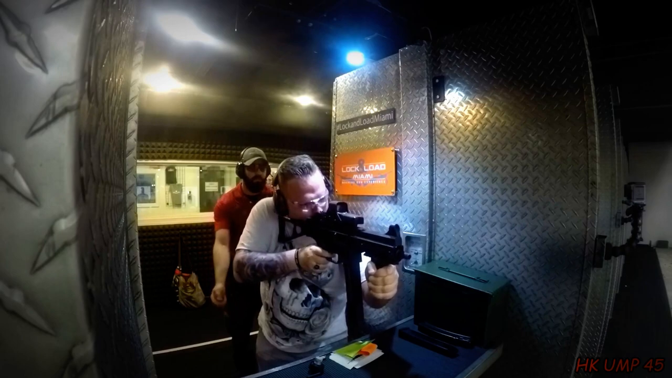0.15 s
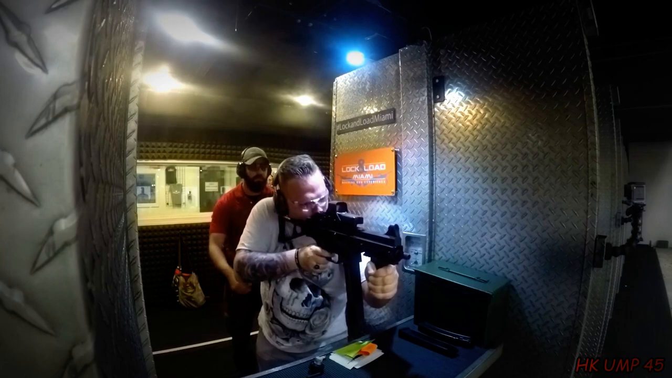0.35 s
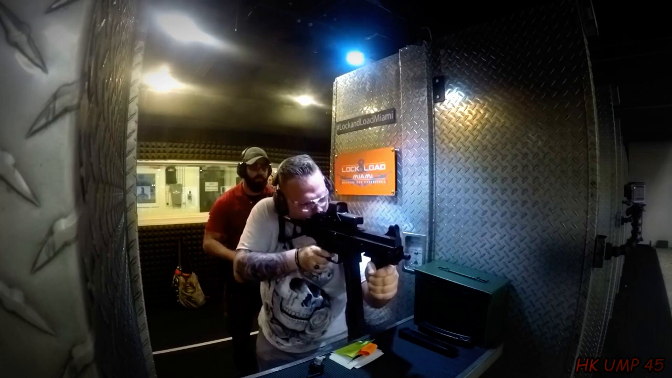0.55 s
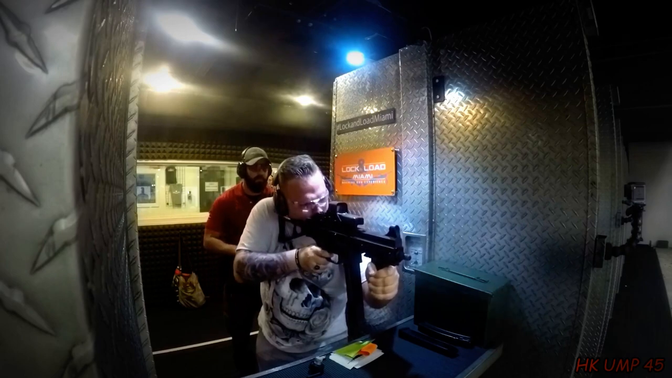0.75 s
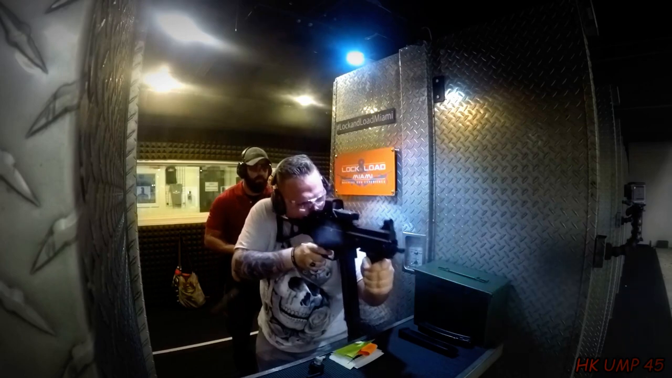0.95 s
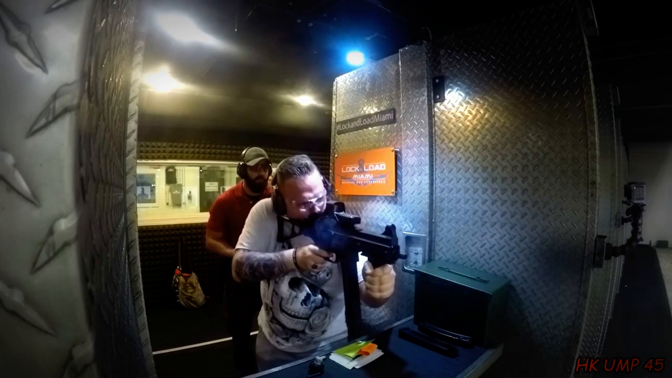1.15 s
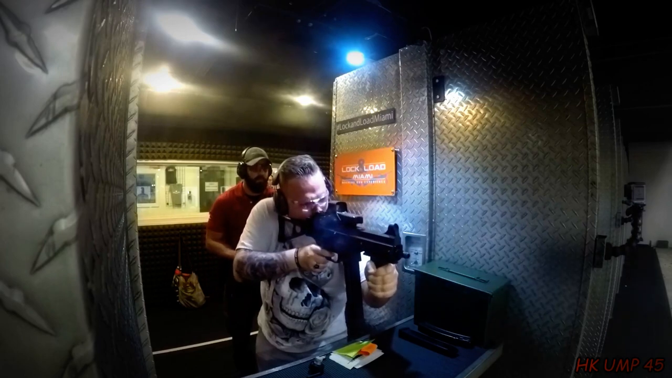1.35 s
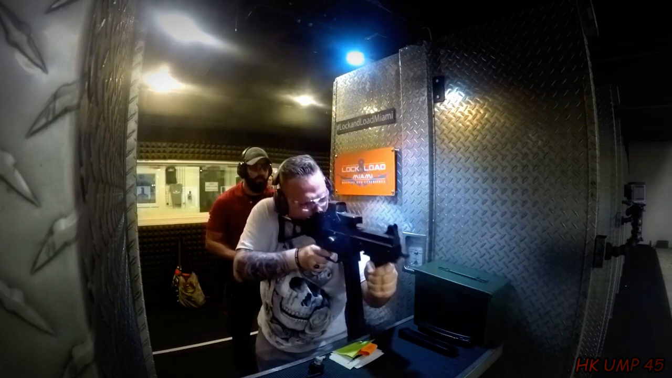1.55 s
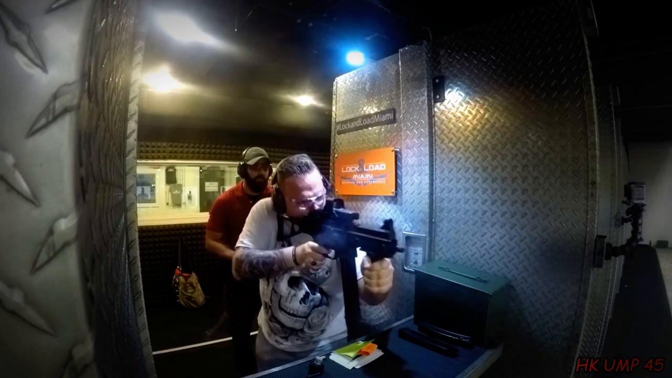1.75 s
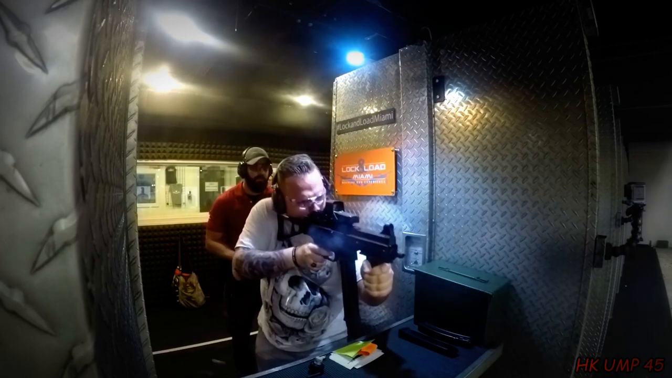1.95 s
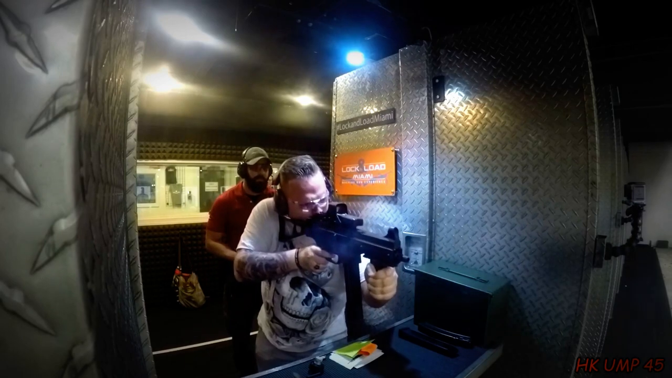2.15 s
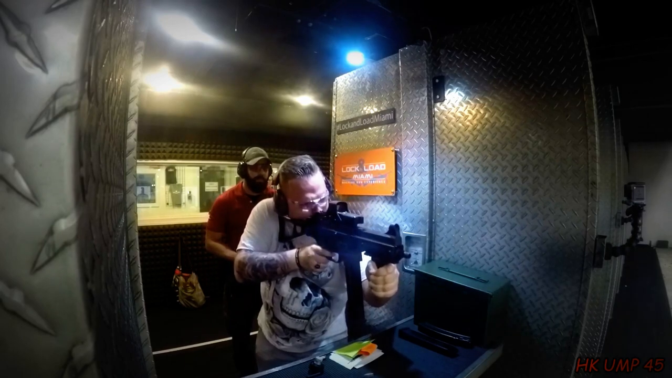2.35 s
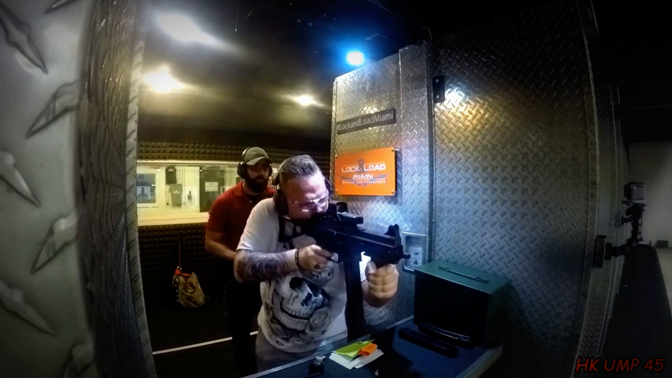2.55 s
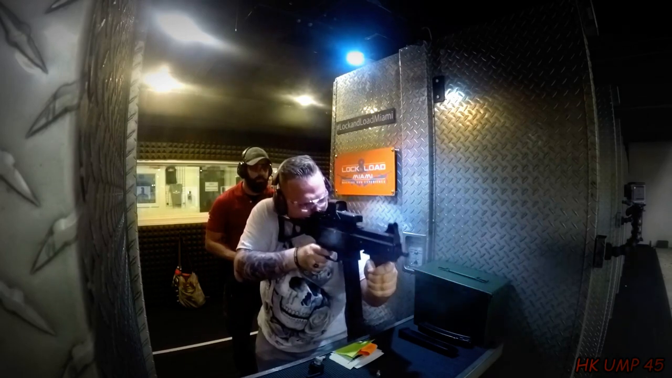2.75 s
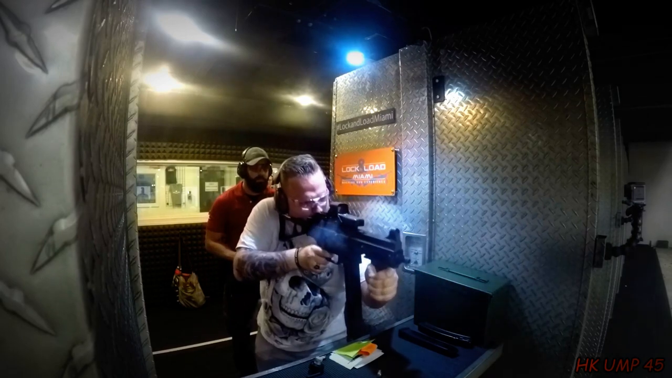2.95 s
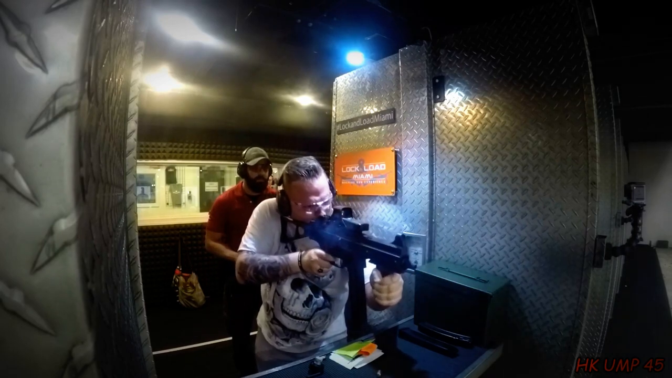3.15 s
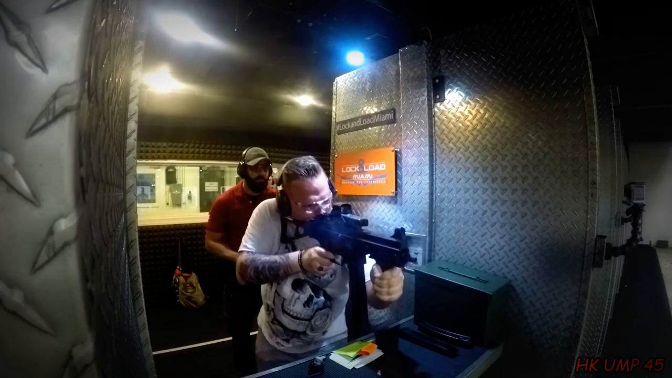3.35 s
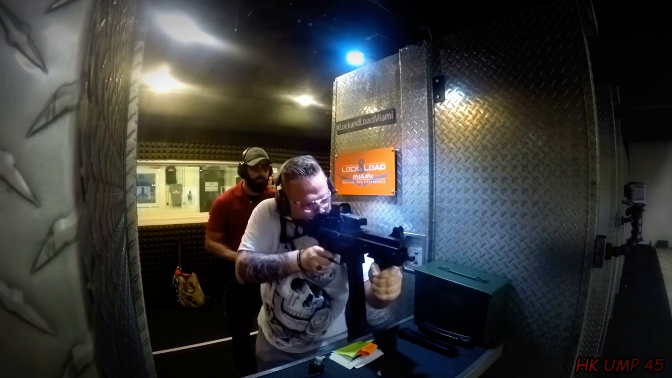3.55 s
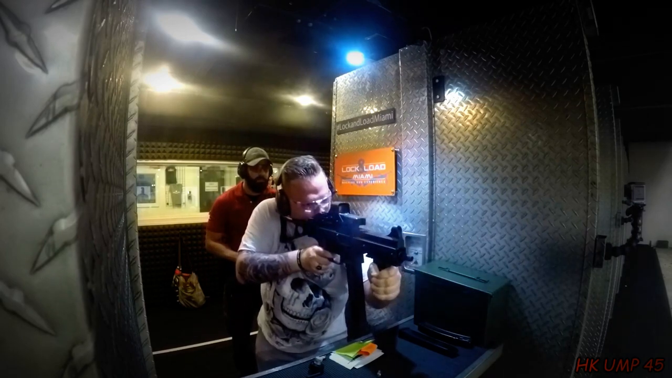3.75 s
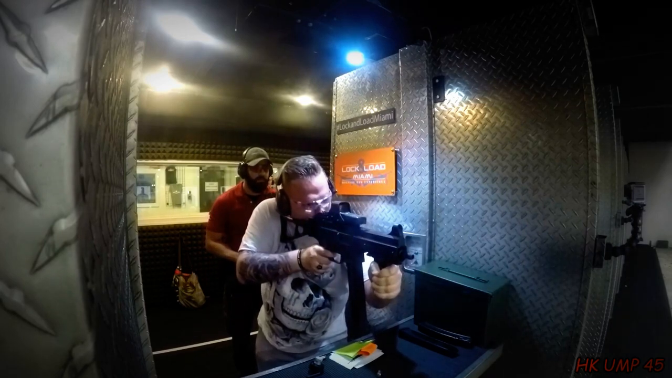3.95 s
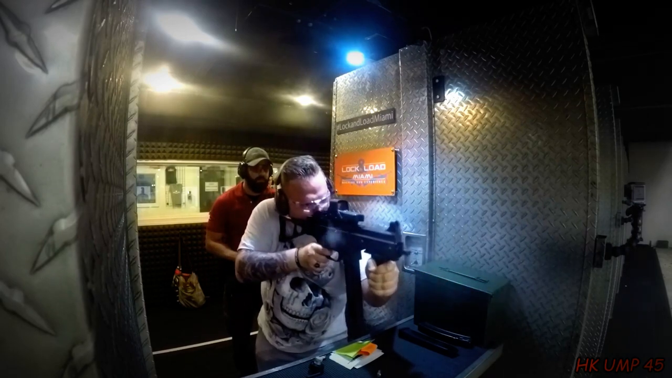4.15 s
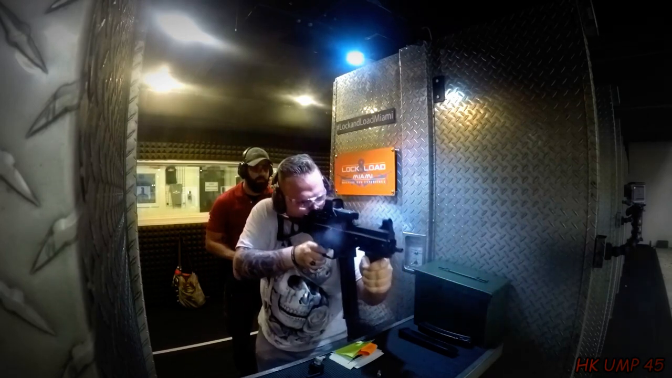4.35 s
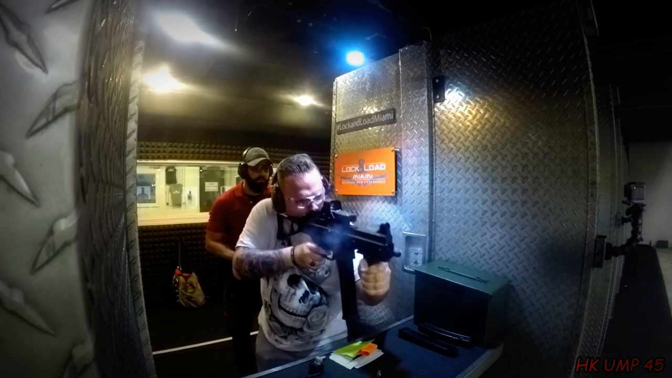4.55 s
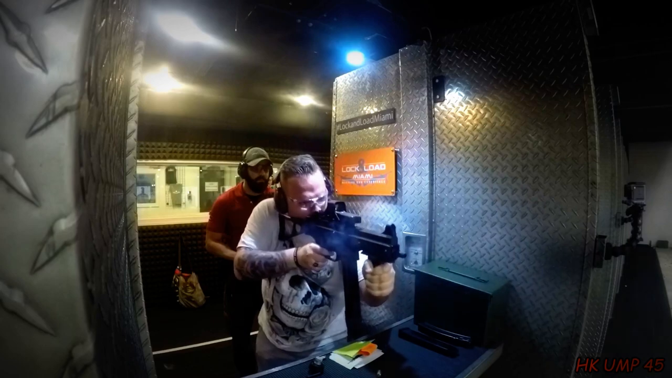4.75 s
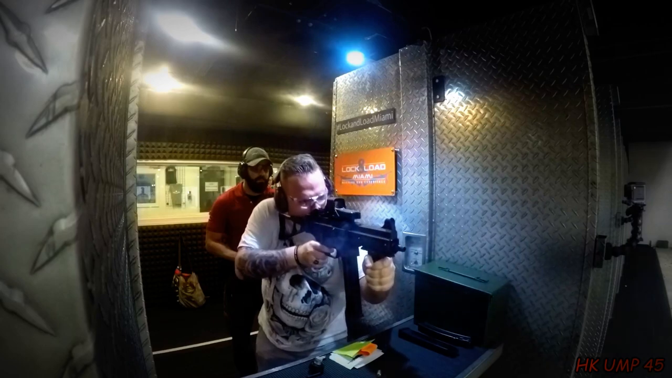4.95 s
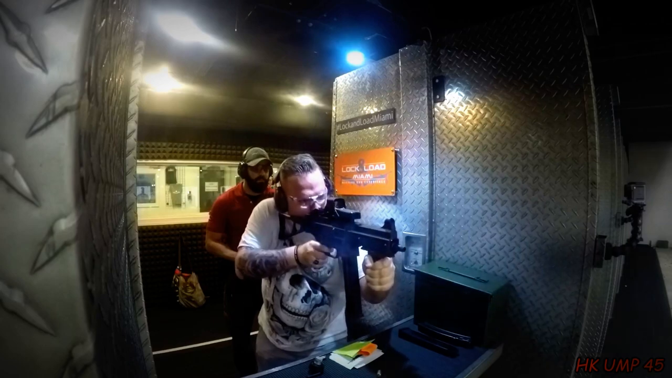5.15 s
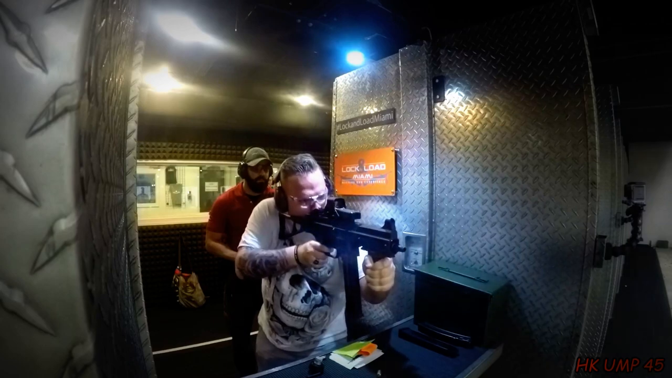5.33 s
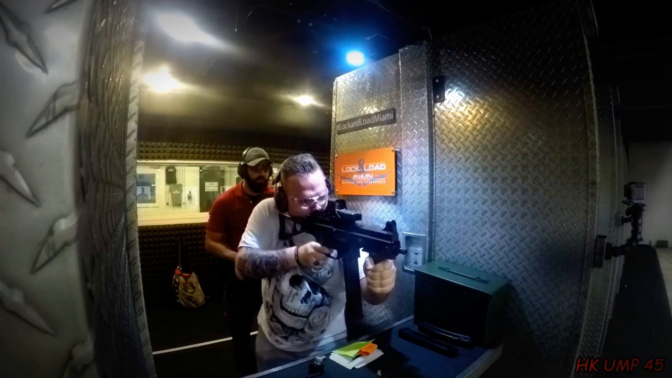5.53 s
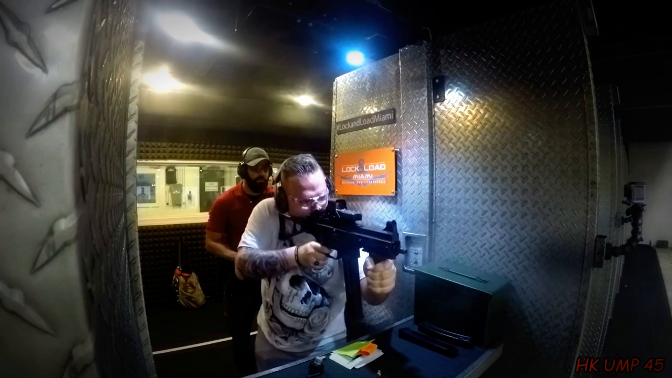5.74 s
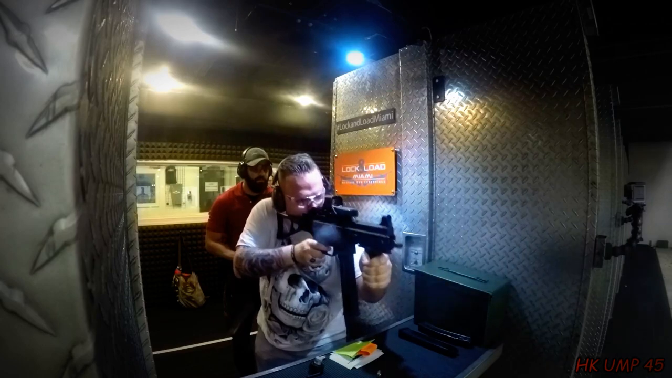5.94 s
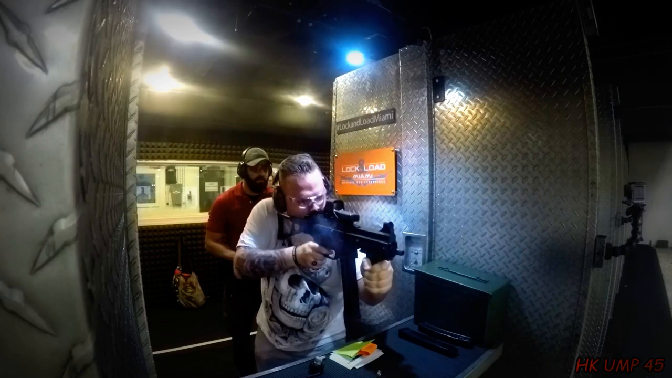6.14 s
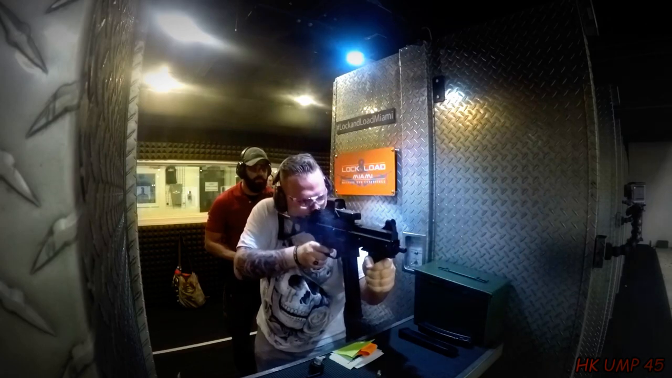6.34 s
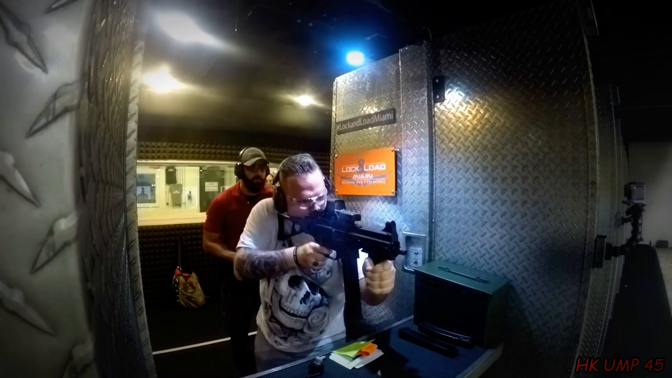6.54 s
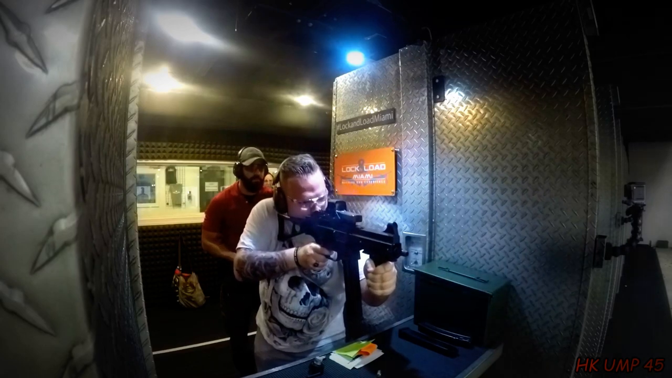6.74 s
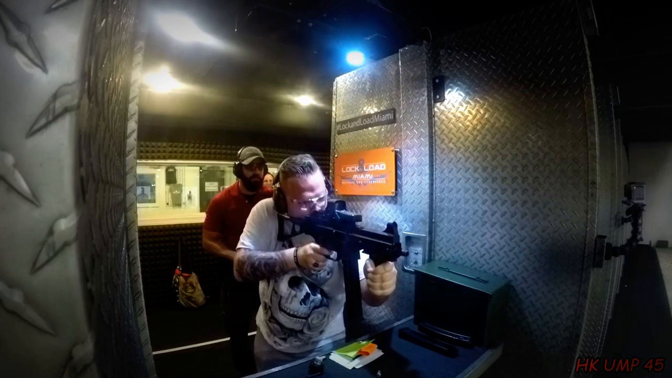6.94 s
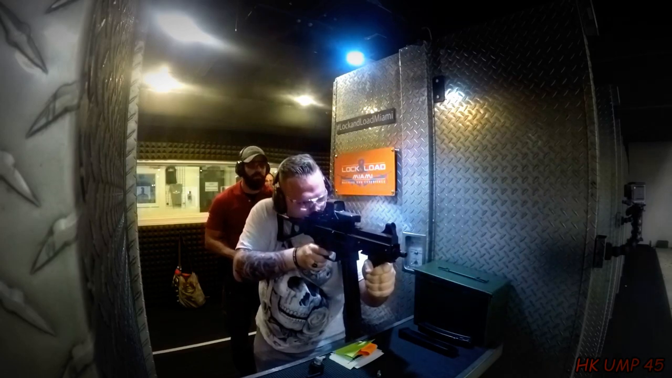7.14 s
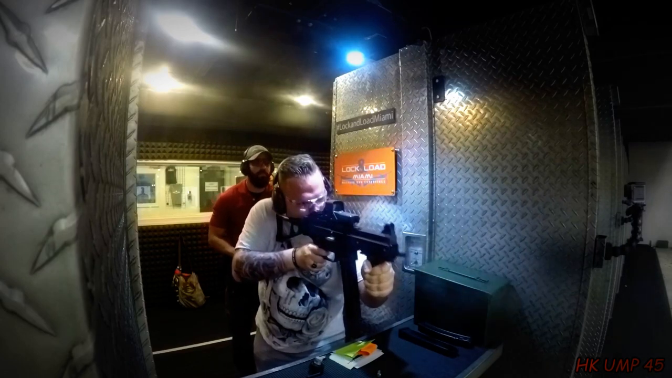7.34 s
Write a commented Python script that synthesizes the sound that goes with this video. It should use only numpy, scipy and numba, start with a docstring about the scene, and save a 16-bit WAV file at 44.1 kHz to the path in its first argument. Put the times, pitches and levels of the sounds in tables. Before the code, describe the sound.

A steady air-extraction rumble opens, then sinks after the first two gunshots. Further bursts follow at uneven gaps, hard and distorted, later rounds squeezed softer by the microphone's automatic gain. Metal walls answer with resonant slaps and about a second of decay; small brass ticks and steel clacks fill the pauses, and a final pair ends abruptly in the tail.

```python
"""Six short submachine-gun bursts crack out of a steel-lined booth of an indoor range over a ventilation rumble.
Each shot is a pressure swing and banded noise, with panel echoes, ringing modes and decay down the hall.
Spent cases tick as clusters of inharmonic partials; a knocked steel panel clacks, then clangs on its modes.
The close microphone overloads: its preamplifier steps down for good after the first burst, sinking the rumble,
and its gain control makes each round of a burst softer than the last, then lets the hiss swell back."""
import sys
import numpy as np
from scipy import signal
from scipy.io import wavfile
from numba import njit

SR = 44100
rng = np.random.default_rng(int(sys.argv[2]) if len(sys.argv) > 2 else 0)


def materialize(psi):
    """Save the field psi as 16-bit PCM at rate SR to the path in sys.argv[1].

    A 1-D psi becomes a single channel; in a 2-D psi each row is a channel.
    """
    bounded = np.clip(np.atleast_2d(psi).T, -1, 1)
    quanta = np.round(bounded * 32767).astype(np.int16)
    wavfile.write(sys.argv[1], SR, quanta)


N = 330309
TIME = np.arange(N) / SR
AGE = TIME[:2 * SR]  # seconds since the onset of one event
BANDS = 25 * 2 ** (np.arange(29) / 3)  # third-octave centres, Hz

# Background spectra per third octave; the preamplifier later raises the ventilation, not the hiss:
# [band_hz, hiss_db, ventilation_db]
BACKGROUND = [(24.9, -60, -62.5), (50, -61.5, -52), (93, -64.5, -70.5), (169.4, -70, -74.5),
              (400, -70.5, -80), (800, -74, -77), (1240, -74.5, -93.5), (2500, -74, -102),
              (4840, -73, -101), (8000, -77, -110), (14000, -79, -110)]
# Strong arrivals of a shot, direct sound first, each with a panel ring; levels relative within the shot:
# [delay_s, crack_db, ring_hz, ring_db, ring_t60_s]
REFLECTIONS = [(0, 1, 862, -6, 0.08), (.0062, -11.5, 233.2, -8, 0.043), (0.0131, -20.5, 150.1, -10, .05),
               (0.0216, -19, 692, -24, .05), (.0352, -10, 762.5, -4.5, 0.029), (.052, -18, 850, -15.5, .05),
               (.057, -17.5, 535.6, -27, 0.046), (.1035, -25.5, 807.5, -28, .04)]


def from_db(db):
    """Amplitude ratio of a level: 20 dB for every factor of ten."""
    return 10 ** (np.asarray(db) / 20)


def dying(t60):
    """Exponential decay: the amplitude falls 60 dB, a factor of 1000, in t60 seconds."""
    return np.exp(-np.log(1000) * AGE / t60)


def per_band(table):
    """Spectrum on a logarithmic pitch axis: each column interpolated at the band centres."""
    hz, *columns = np.transpose(table)
    return [np.interp(np.log(BANDS), np.log(hz), column)[:, None] for column in columns]


def noise_bank(size):
    """Band-filtered white noise: third-octave bands of rms 1, neighbours drawn from separate noises."""
    settling = SR // 2  # samples dropped while the filters settle
    white = rng.standard_normal((2, size + settling))
    half = 2 ** (1 / 6)  # half a band's width as a frequency ratio
    bank = []
    for k, hz in enumerate(BANDS):
        sos = signal.butter(2, [hz / half, hz * half], "band", fs=SR, output="sos")
        bank.append(signal.sosfilt(sos, white[k % 2])[-size:])
    bank = np.array(bank)
    return bank / bank.std(axis=1, keepdims=True)


def ring(hz, db, t60):
    """Free vibration of one struck mode: an exponentially damped sine."""
    return from_db(db) * np.sin(2 * np.pi * hz * AGE) * dying(t60)


def delayed(x, s):
    """Propagation delay: the same sound, s seconds later."""
    return np.pad(x, (round(s * SR), 0))[:len(x)]


def add(track, s, sound):
    """Superposition: pressures add, from time s onwards."""
    part = track[round(s * SR):][:len(sound)]
    part += sound[:len(part)]


def ventilation():
    """Stationary broadband noise: the steady rumble of the range's air extraction."""
    _, rumble_db = per_band(BACKGROUND)
    return (from_db(rumble_db) * noise_bank(N)).sum(axis=0)


def self_noise(whine_hz=649, whine_db=-67):
    """Electronic noise added after the preamplifier: shaped hiss and a faint sinusoidal whine."""
    hiss_db, _ = per_band(BACKGROUND)
    hiss = (from_db(hiss_db) * noise_bank(N)).sum(axis=0)
    return hiss + from_db(whine_db) * np.sin(2 * np.pi * whine_hz * TIME)


def muzzle_blast(swing_hz=72, swing_db=-3, length_s=0.0165, lag_s=.0009):
    """Expanding gas gives a deep pressure swing that is spent after about a cycle and a half."""
    fade = np.exp(-(AGE / length_s) ** 4)
    swing = -np.sin(2 * np.pi * swing_hz * AGE) * fade
    return from_db(swing_db) * delayed(swing, lag_s)


def report_envelope(crack_t60=0.0058, booth_t60=0.056, lane_rise_s=0.018, hall_rise_s=.05, wall_cut_hz=6800):
    """Reverberant build-up and decay: crack and duller echoes, then ever larger spaces filling and draining."""
    # relative levels of the four stages per third octave: [band_hz, crack_db, booth_db, lane_db, hall_db]
    stages = [(33.8, -42.5, -25.5, -35.5, -57.5), (68, -32, -23, -29, -48), (132, -24.5, -12.5, -29, -44.5),
              (297, -25, -19, -25.5, -40.5), (520, -16, -13, -21.5, -39.5), (813, -13, -8.5, -15, -35),
              (1310, -22.5, -11.5, -29.5, -48), (1880, -12, -15, -24.5, -45),
              (2940, -18.5, -17.5, -24, -45.5), (3670, -13, -13.5, -37, -53), (5160, -6, -25, -32.5, -51.5),
              (6880, -21, -33, -44, -60.5), (8840, -20.5, -29, -44, -69.5), (13600, -30, -40, -50.5, -77.5)]
    # reverberation times: [band_hz, lane_t60_s, hall_t60_s]
    decay = [(100, .41, .93), (810, .45, 0.89), (1950, 0.38, 1), (2570, 0.36, 1), (3700, .38, 1),
             (5200, 0.41, 0.98), (8000, 0.38, 0.48), (14000, 0.3, .48)]
    crack, booth, lane, hall = map(from_db, per_band(stages))
    lane_t60, hall_t60 = per_band(decay)
    direct, *echoes = [delayed(from_db(db) * dying(crack_t60), s) ** 2 for s, db, *panel in REFLECTIONS]
    reflected = 1 / (1 + (BANDS[:, None] / wall_cut_hz) ** 4)  # share of power the walls return
    # unrelated noises add by power
    power = crack ** 2 * (direct + reflected * sum(echoes))
    power += (booth * dying(booth_t60)) ** 2
    power += (lane * dying(lane_t60)) ** 2 * (1 - np.exp(-AGE / lane_rise_s))
    power += (hall * dying(hall_t60)) ** 2 * (1 - np.exp(-AGE / hall_rise_s))
    return np.sqrt(power)


def sheet_ring(low_hz=2650, high_hz=3120, level_db=-64, t60=1.1, count=40):
    """Dense plate modes: the steel lining keeps singing in a narrow cluster of frequencies."""
    modes_hz = rng.uniform(low_hz, high_hz, count)
    return sum(ring(hz, level_db, t60) * rng.choice([-1, 1]) for hz in modes_hz)


def gun(muzzle_db=24.5, alike=.6, alike_t60=0.63, ring_scatter=0.0052, scatter_db=-0.5):
    """Partial coherence: shots share some early echo pattern; later sound has crossed stirred air and differs."""
    # rounds fired, strength relative to muzzle_db: [start_s, strength_db]
    rounds = [(0.8285, -0.5), (.927, -3.5), (1.604, 3), (1.7026, 1), (1.8086, 0.5), (2.7222, 0),
              (2.8283, -1), (4.1249, 2.5), (4.2258, 0), (4.331, -3), (4.4417, -3.5), (5.7917, -4),
              (5.891, -7), (7.376, 1.5), (7.4808, 0.5)]
    # standing waves of the booth, levels relative within a shot: [mode_hz, level_db, t60_s]
    standing_waves = [(53, -21.5, 0.068), (99, -21.5, 0.11), (136.5, -21.5, 0.6), (171, -17, 0.17),
                      (219.8, -23.5, 0.26), (263.6, -26, 0.42), (359.3, -26.5, 0.38), (391, -29.5, 0.4),
                      (525, -24.5, 0.21), (541.3, -25, 0.58), (592, -26, .25), (671, -28, 0.7),
                      (755, -27, 0.1), (795, -22, 0.33), (837, -27, 0.41), (880, -23, 0.61),
                      (907, -21, 0.1), (1100, -28.5, 0.2), (1120, -28, 0.11), (1269, -31, 0.43),
                      (1781, -30.5, 0.098), (1863, -29, .2), (2035, -31.5, 0.26), (2852, -30, 0.086)]
    out = np.zeros(N)
    envelope = from_db(scatter_db) * report_envelope()
    likeness = alike * dying(alike_t60)  # share of noise power common to all shots
    shared = np.sqrt(likeness) * (envelope * noise_bank(len(AGE))).sum(axis=0)
    body = muzzle_blast() + sheet_ring() + sum(ring(*mode) for mode in standing_waves)
    turbulence = noise_bank(N + len(AGE))
    # each panel's pitch shifts slightly from shot to shot
    detunes = 1 + ring_scatter * rng.standard_normal((len(rounds), len(REFLECTIONS)))
    for (s, db), detune in zip(rounds, detunes):
        fresh = turbulence[:, round(s * SR):][:, :len(AGE)]
        own = np.sqrt(1 - likeness) * np.einsum("bt,bt->t", envelope, fresh)
        panels = np.zeros(len(AGE))
        for (lag, _, hz, ring_db, t60), ratio in zip(REFLECTIONS, detune):
            panels += delayed(ring(hz * ratio, ring_db, t60), lag)
        add(out, s, from_db(muzzle_db + db) * (shared + own + body + panels))
    return out


def cases(case_db=16, ring_t60=.08, ring_db=-20, contact_t60=0.012, room_db=-13, room_t60=0.16,
          spread=.35, breadth=.6):
    """Impact excitation: a landing brass case gives a broad click, inharmonic partials and a little room sound."""
    # spent cases landing, peak relative to case_db: [start_s, peak_db, pitch_hz]
    landings = [(1.134, -58.5, 8870), (1.475, -49.5, 3400), (2.174, -35, 9300), (2.225, -50, 12850),
                (2.2626, -42.5, 5600), (2.331, -59.5, 10430), (3.1233, -56, 5950), (3.2718, -44.5, 6500),
                (3.33, -60, 8300), (4.7474, -50, 9000), (4.915, -60.5, 9000), (6.242, -57, 3801),
                (6.275, -65, 3500), (6.3386, -60, 4540)]
    out = np.zeros(N)
    grit = noise_bank(N + len(AGE))
    envelope = dying(contact_t60) + from_db(room_db) * dying(room_t60)
    for s, db, hz in landings:
        partials = hz * np.exp(spread * rng.standard_normal(size=16))
        partials = np.minimum(partials, SR / 2)
        brass = sum(ring(f, ring_db, ring_t60) * rng.choice([-1, 1]) for f in partials)
        colour = np.exp(-np.log(BANDS / hz) ** 2 / breadth)  # click spectrum, centred on the pitch
        click = colour @ grit[:, round(s * SR):][:, :len(AGE)] * envelope
        tick = brass + click
        add(out, s, from_db(db + case_db) * tick / np.abs(tick).max())
    return out


def knocks(clack_t60=.27):
    """Modal response: a knock on a steel panel gives a noisy clack, after which the steel rings on."""
    # knocks on the panel: [start_s, level_db]
    blows = [(2.4921, -24.5), (5.309, -53), (6.4489, -39), (6.635, -48.5), (7.155, -59.5)]
    # the panel's modes, relative within a knock: [mode_hz, level_db, t60_s]
    panel_modes = [(791, -12.5, 0.65), (852, -15, .45), (920, -8.5, 0.37), (1260, -20.5, 0.53),
                   (1440, -19.5, .7), (2509, -24, 0.83), (2670, -15, 0.31), (2850, -21.5, 0.3),
                   (3480, -14, .24), (3607, -28, .6), (4759, -26, .35)]
    # clack spectrum per third octave, relative within a knock: [band_hz, level_db]
    clack_spectrum = [(150, -40), (400, -20.5), (680, -5), (1100, -18.5), (2000, -24), (3300, -14.5),
                      (5000, -21), (8000, -30), (14000, -33.5)]
    out = np.zeros(N)
    clack = (from_db(per_band(clack_spectrum)[0]) * noise_bank(len(AGE))).sum(axis=0) * dying(clack_t60)
    clang = sum(ring(*mode) for mode in panel_modes)
    for s, db in blows:
        add(out, s, from_db(db) * (clack + clang))
    return out


def scene():
    """Superposition of everything that reaches the microphone."""
    return (ventilation() + gun() + cases() + knocks())[None, :]


def housing(x):
    """Resonance: the case around the microphone lifts some bands and hollows out others."""
    # resonances and dips, applied in series: [centre_hz, width_hz, gain_db]
    resonances = [(1440, 600, 0), (1944, 120, 4), (2776, 650, 2.5), (3450, 1100, -4.5), (4950, 500, 3.5),
                  (7100, 460, -8), (8520, 1000, 0)]
    for hz, width, db in resonances:
        b, a = signal.iirpeak(hz, hz / width, fs=SR)
        x = x + (from_db(db) - 1) * signal.lfilter(b, a, x)
    return x


def preamp(x, extra_db=15, wait_s=0.18, fall_db_per_s=68):
    """Triggered gain: set for a quiet room until the first overload, then soon turned down for good."""
    first_overload = np.argmax(np.abs(x[0]) > 1)
    since_overload = TIME - TIME[first_overload]
    cut_db = np.clip(fall_db_per_s * (since_overload - wait_s), 0, extra_db)
    return x * from_db(extra_db - cut_db)


@njit
def stored_energy(energy, keep):
    """Leaky integration: a store starts at 1, collects energy and loses a fixed share of its decibels a sample."""
    out, store = np.empty(len(energy)), 1.0
    for i in range(len(energy)):
        store = store ** keep + energy[i]
        out[i] = store
    return out


def gain_control(x, knee_db=-19, release_s=1, look_ahead_s=0.0007):
    """Compression by stored energy: each round pushes the gain lower, and it creeps back between bursts."""
    # energy at the knee, fed to a store at rest, halves the output power
    energy = (x[0] / from_db(knee_db)) ** 2 / SR
    store = stored_energy(energy, np.exp(-1 / (release_s * SR)))
    ahead = np.interp(TIME + look_ahead_s, TIME, store)
    return x / np.sqrt(ahead)


def record(dry):
    """Signal chain: housing colour, preamplifier, self-noise, gain control, saturation and low-pass filtering."""
    x = gain_control(preamp(housing(dry)) + self_noise())
    x = .975 * x / (1 + x ** 4) ** (1 / 4)  # overload flattens the peaks towards 0.975
    # 95 dB down from 16600 Hz upwards
    return signal.sosfilt(signal.cheby2(16, 95, 16600, fs=SR, output="sos"), x)


dry = scene()
out = record(dry)
materialize(out)
```